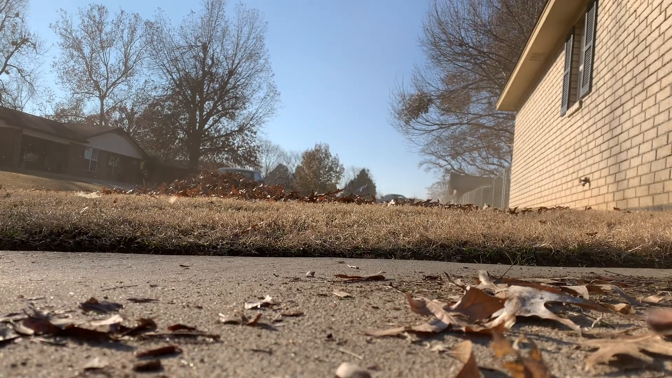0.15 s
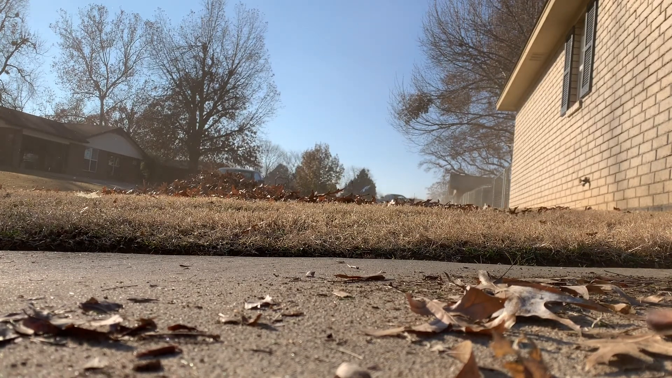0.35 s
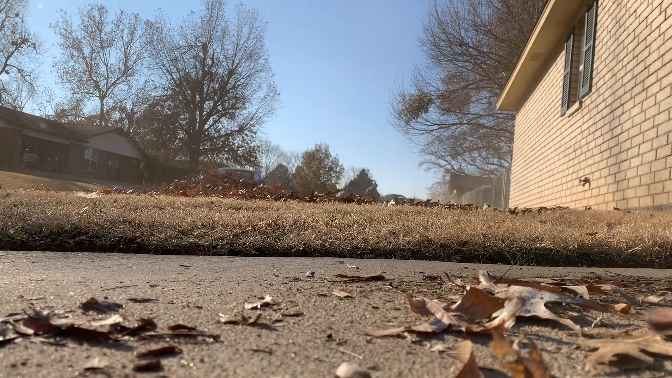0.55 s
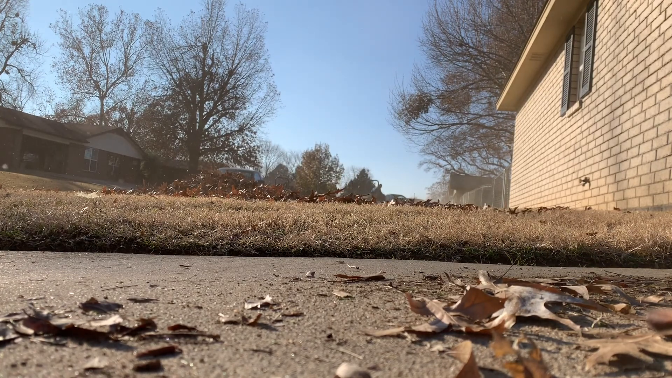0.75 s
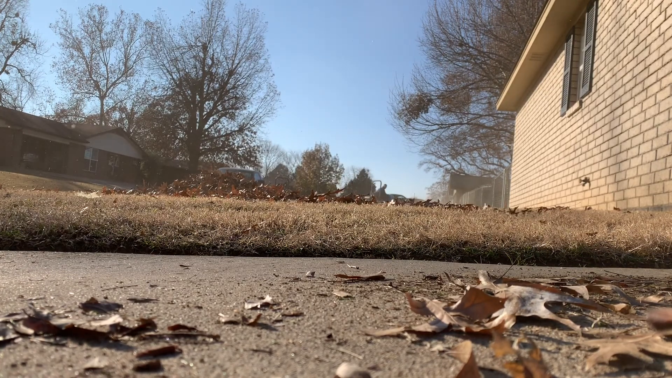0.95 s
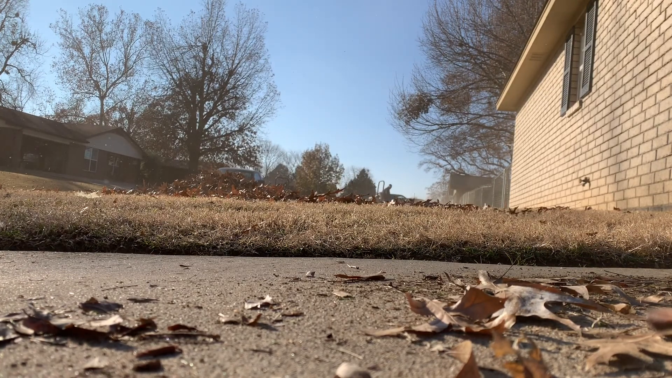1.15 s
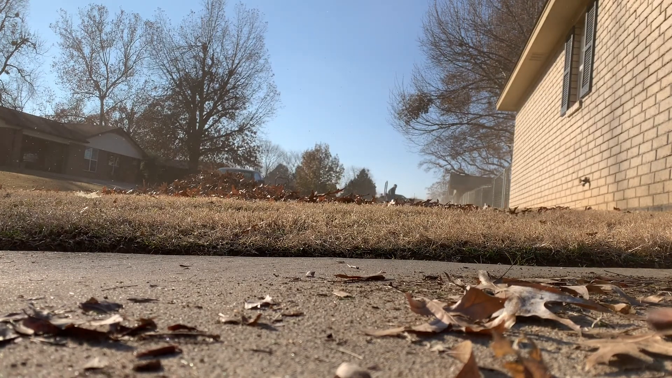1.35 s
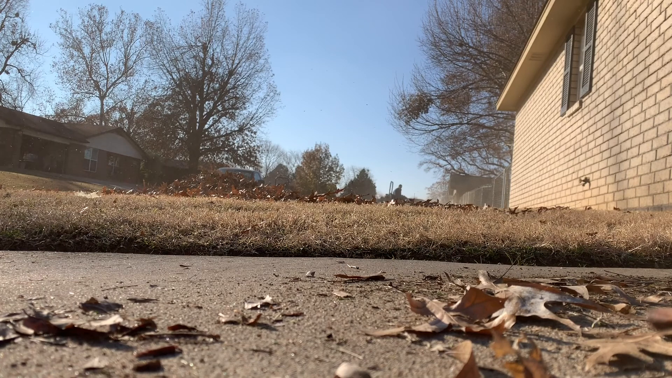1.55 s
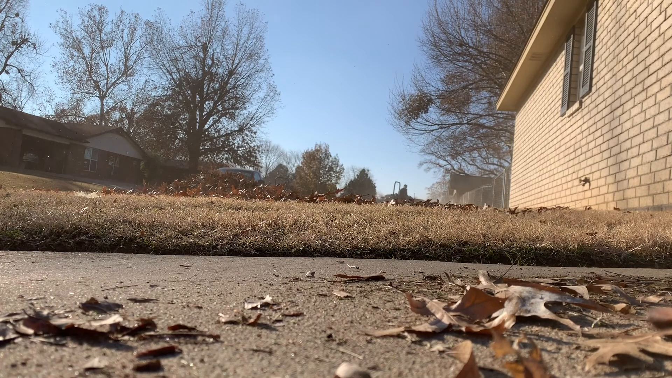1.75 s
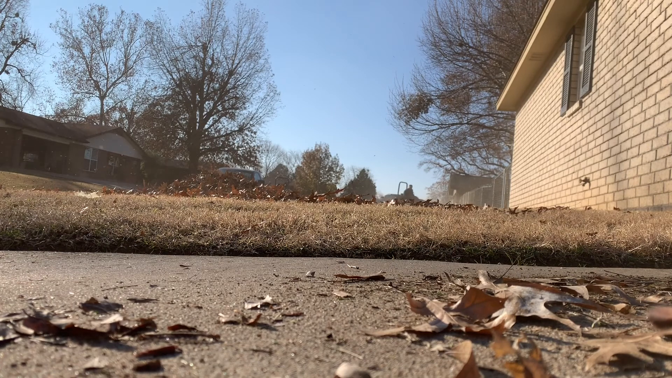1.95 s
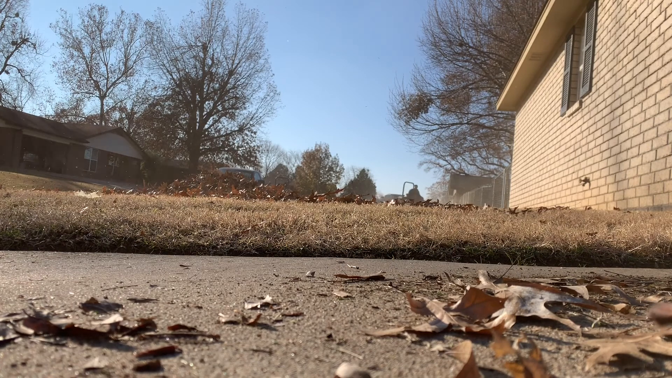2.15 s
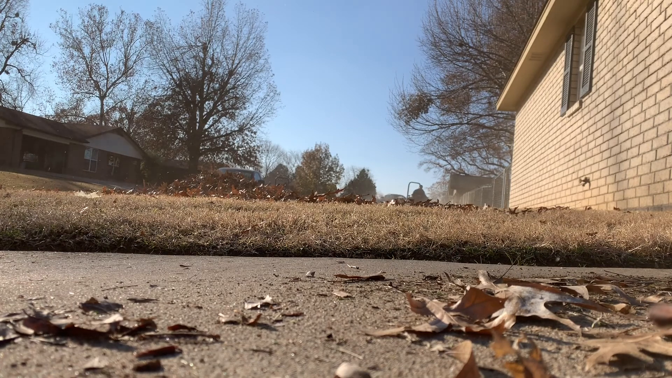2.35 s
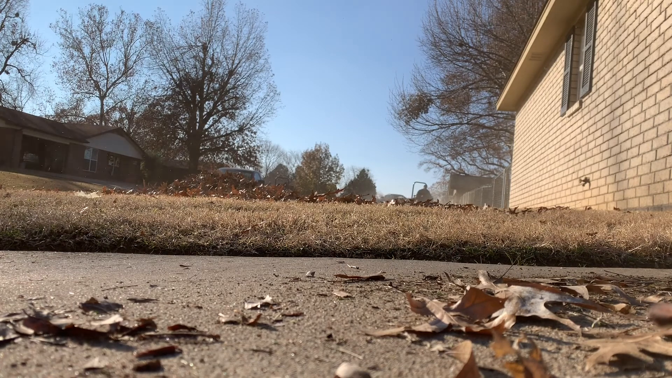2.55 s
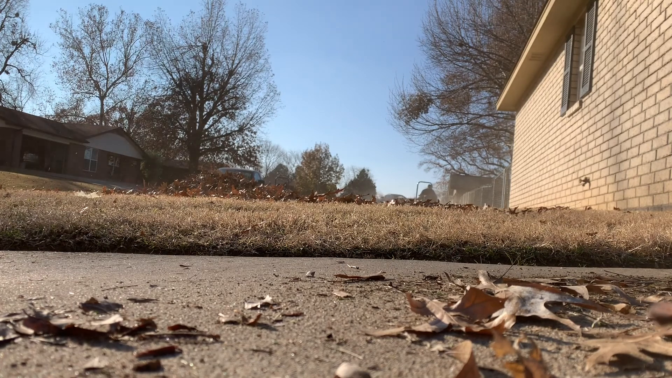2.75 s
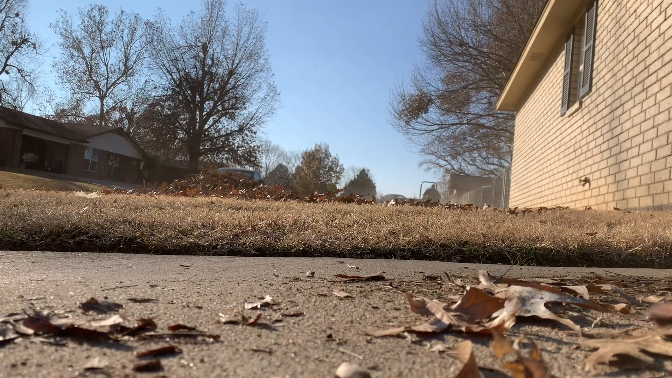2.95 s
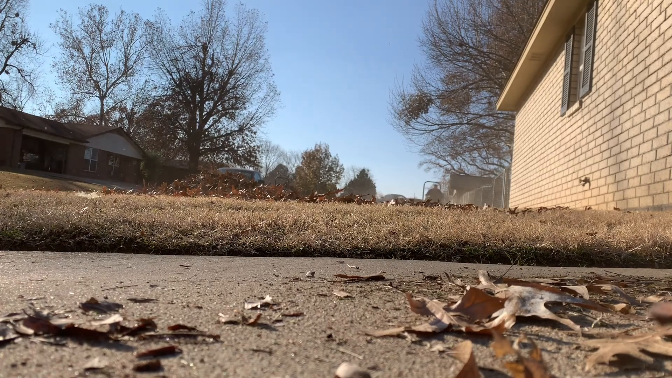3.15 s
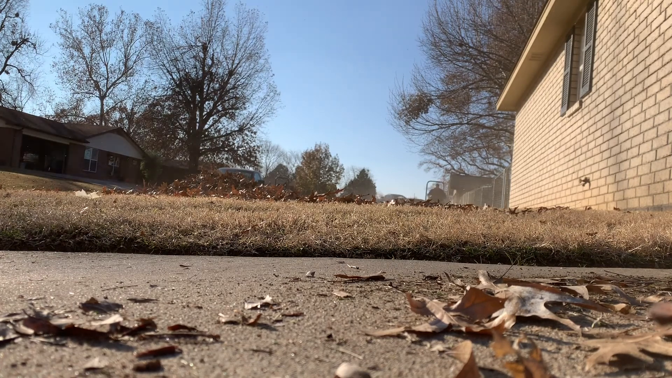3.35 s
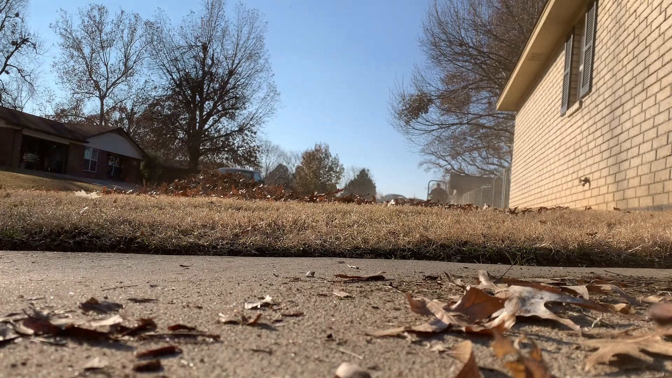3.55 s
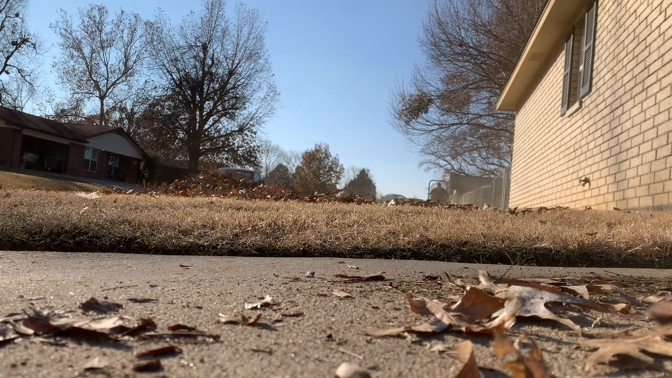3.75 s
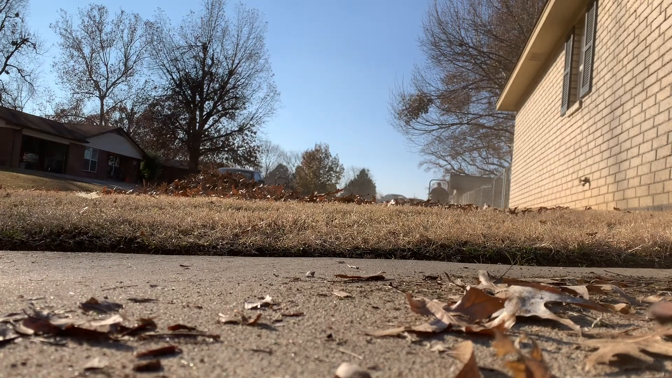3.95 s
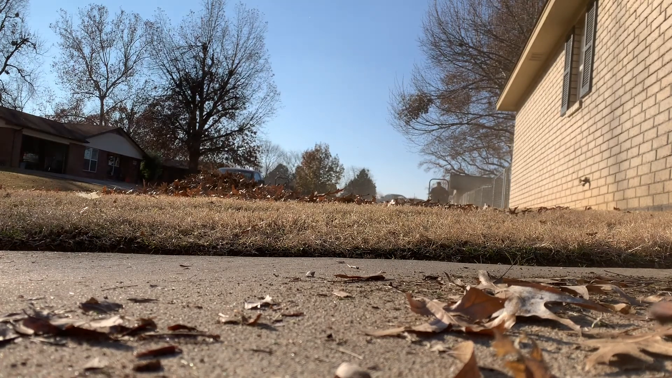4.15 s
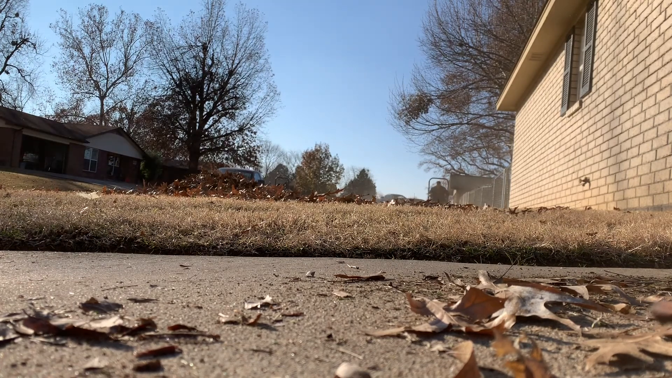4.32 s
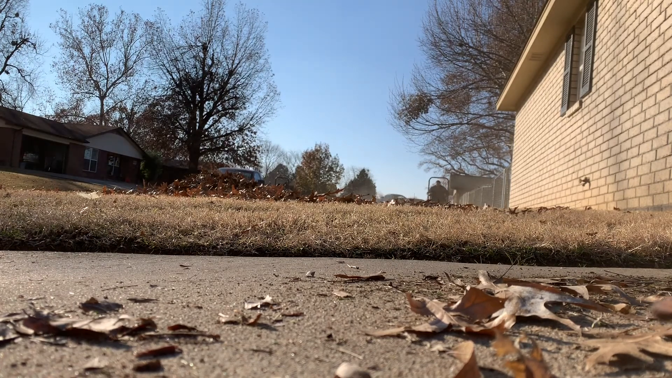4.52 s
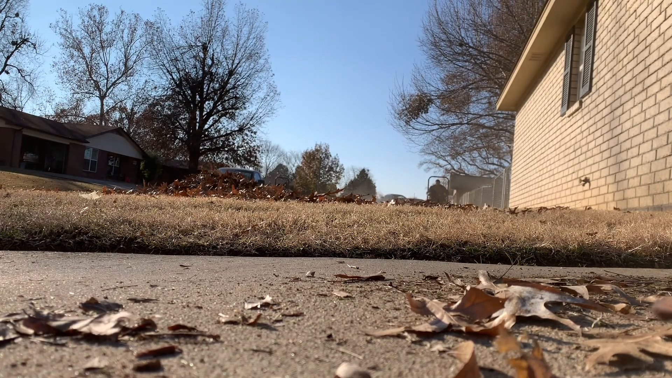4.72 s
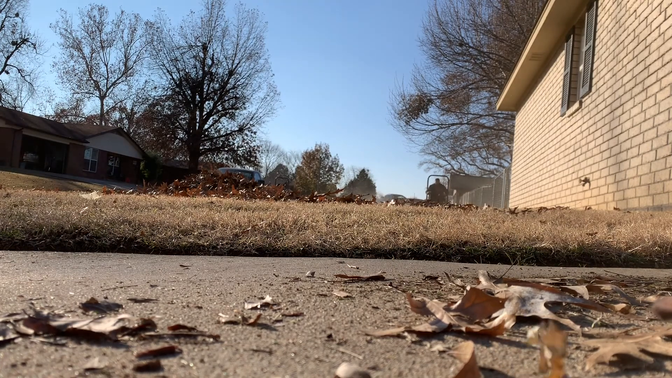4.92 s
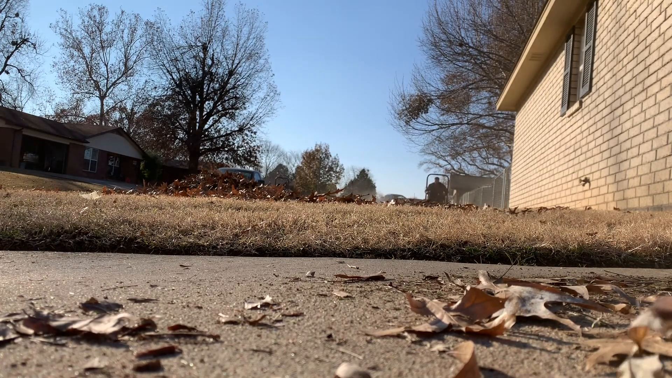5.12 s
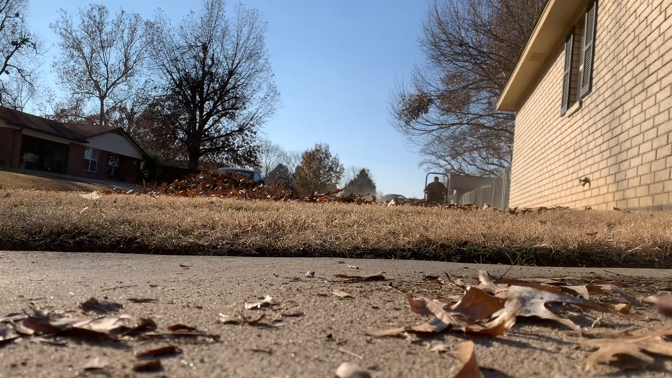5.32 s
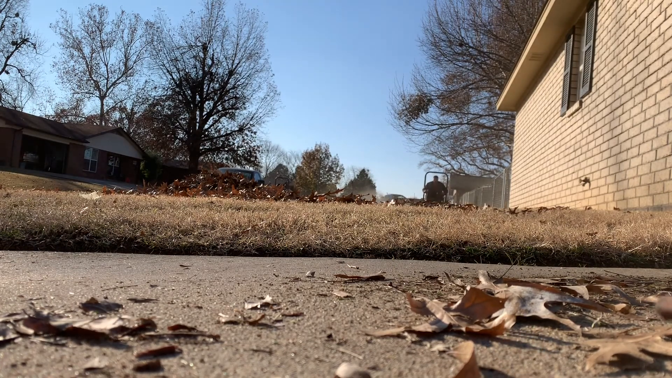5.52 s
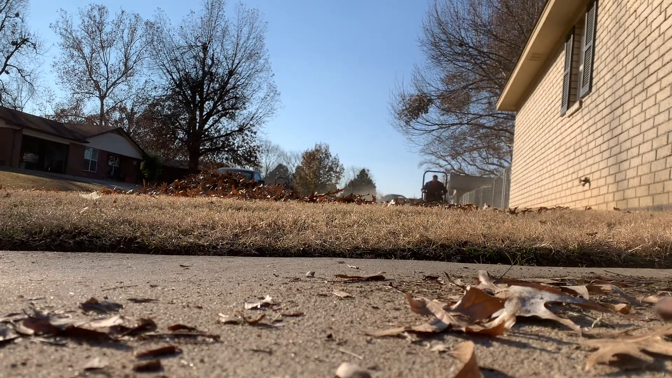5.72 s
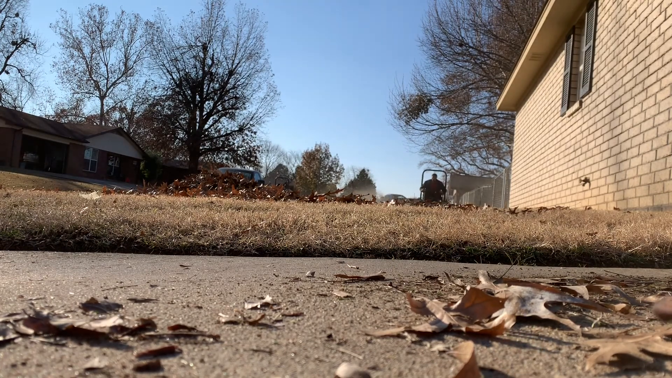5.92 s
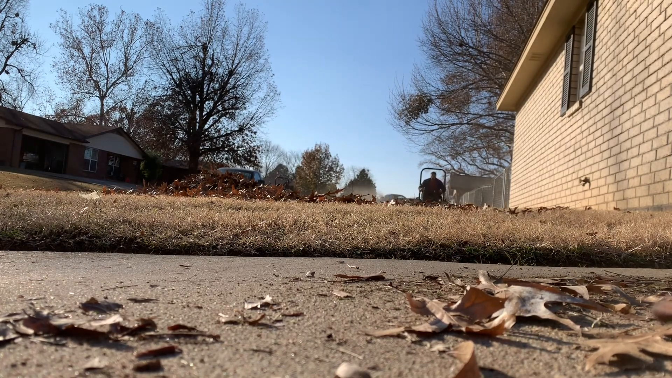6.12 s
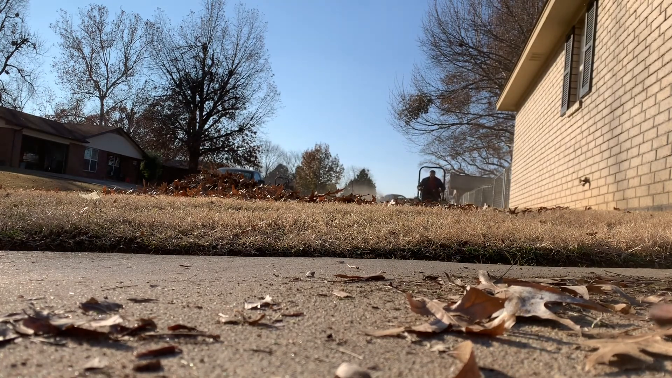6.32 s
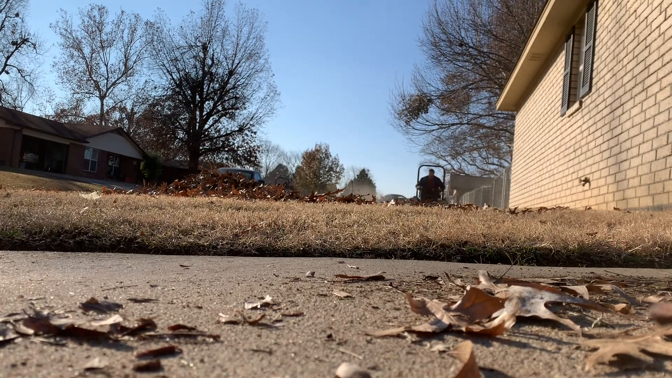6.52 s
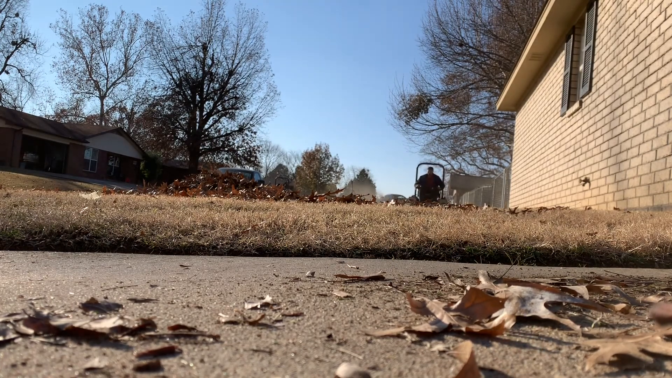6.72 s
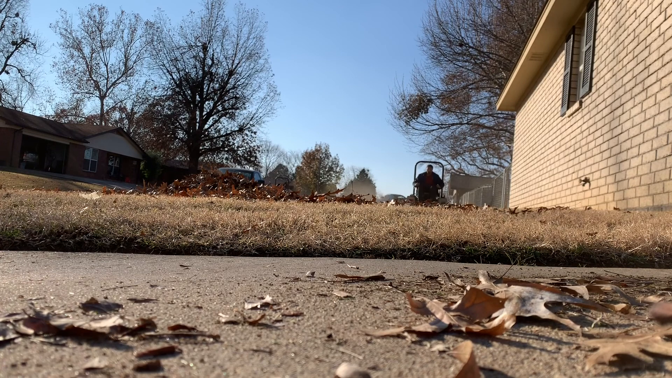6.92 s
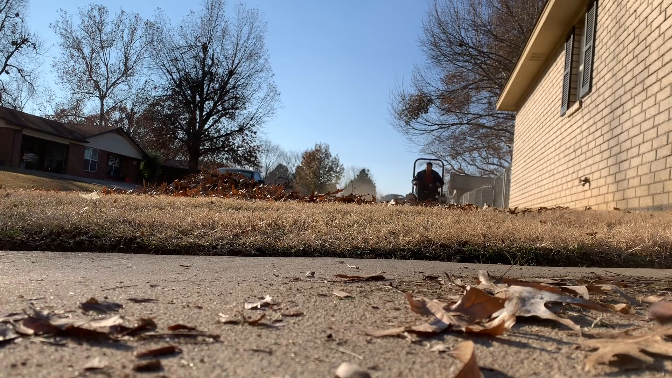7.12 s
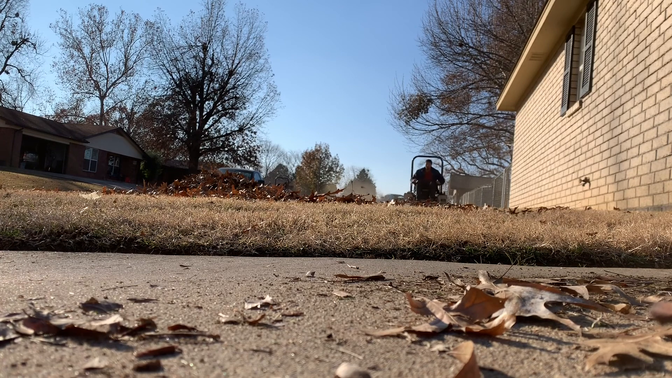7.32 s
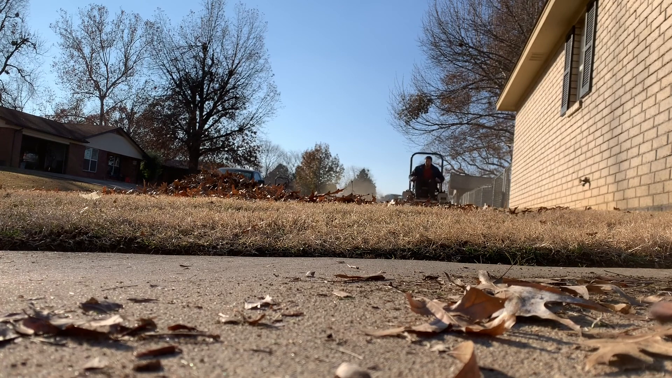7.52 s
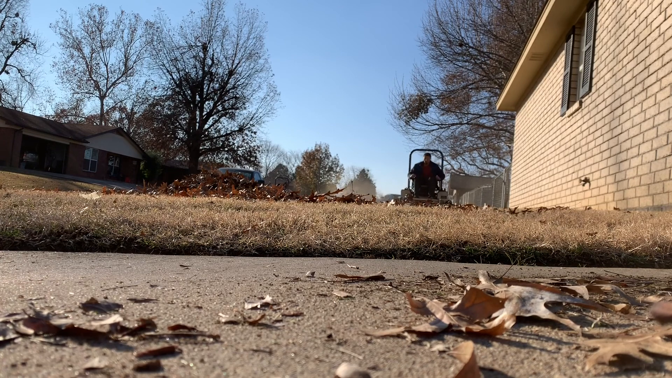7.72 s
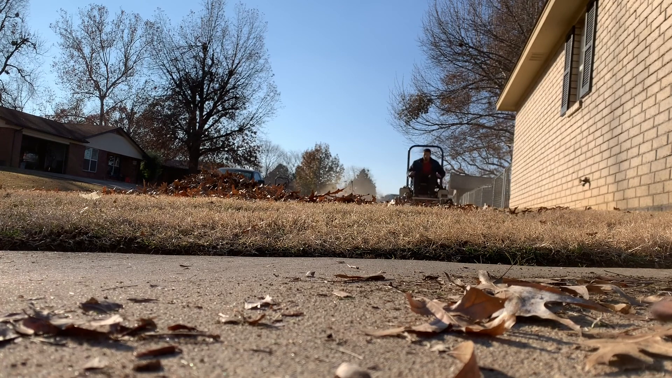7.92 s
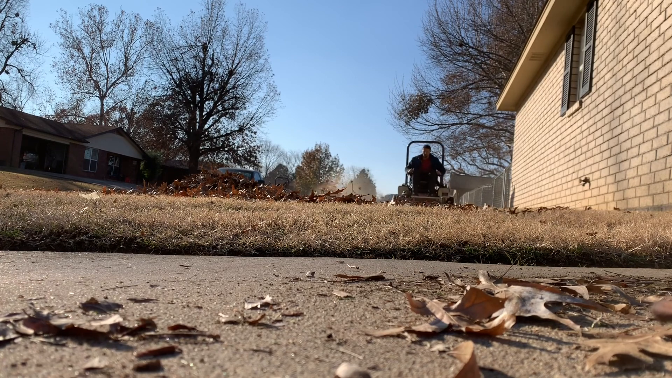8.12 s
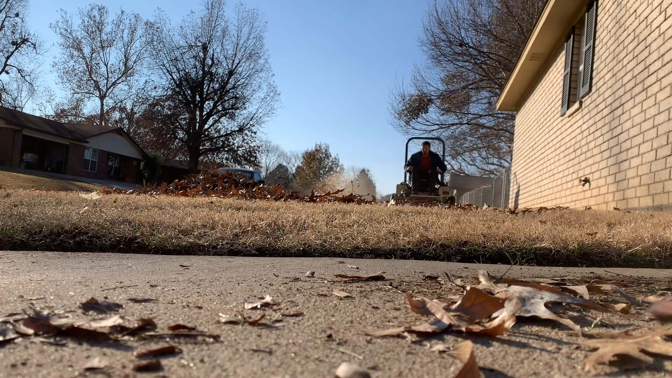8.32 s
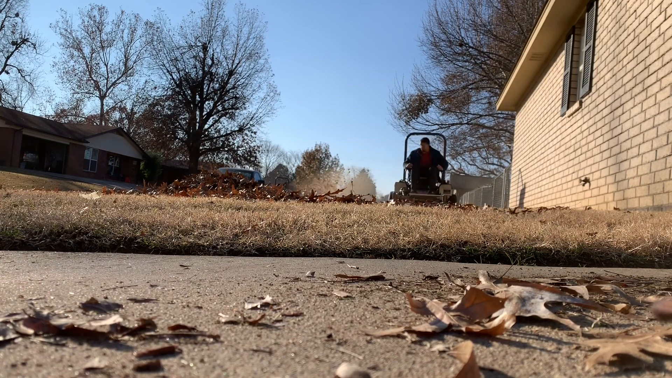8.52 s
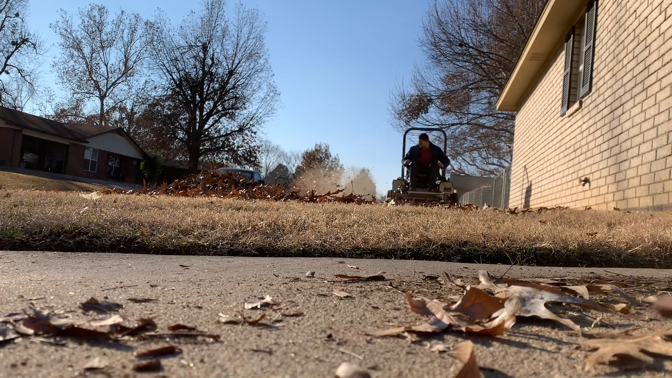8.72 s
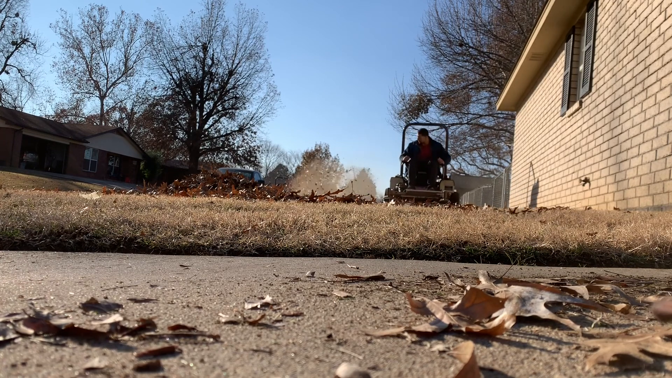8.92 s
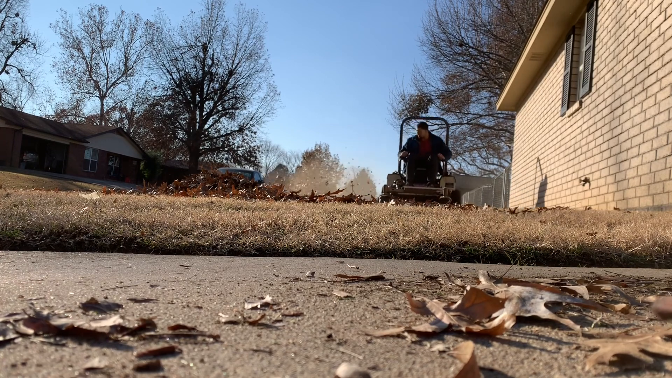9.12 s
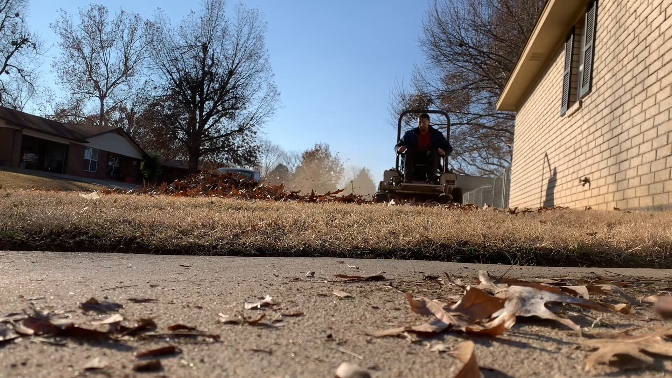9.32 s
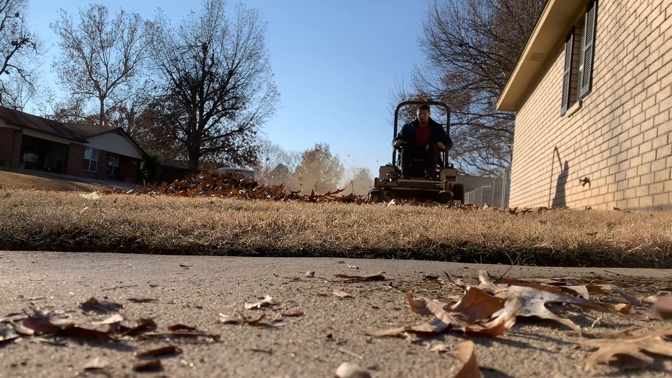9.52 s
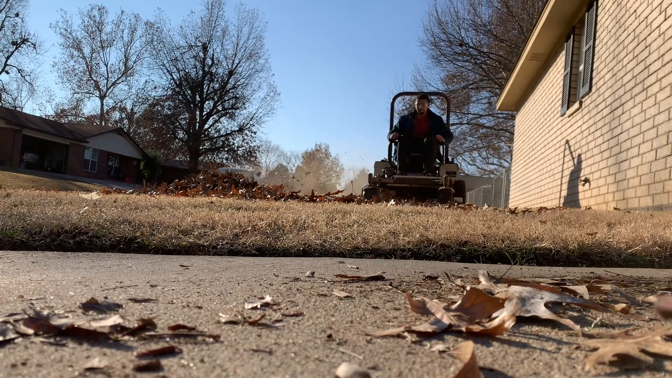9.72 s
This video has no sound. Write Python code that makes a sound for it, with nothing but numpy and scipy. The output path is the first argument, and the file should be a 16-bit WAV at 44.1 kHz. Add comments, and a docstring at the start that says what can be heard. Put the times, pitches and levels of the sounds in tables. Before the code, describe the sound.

Outdoors, a ride-on mower runs continuously, heard from a fixed microphone close to the ground. From 0 to 2 seconds it is distant: a low, steady engine hum near 60 to 180 hertz with a blade drone around 130 hertz that beats and wavers, a soft airy roar, and a few faint leaf ticks near 0.7. Between 2 and 4 seconds it turns and the deck roar opens. From about 4 seconds dry leaf hiss rises, with a wind buffet around 5 and a brief shredding surge near 5.9. Bright leaf snaps scatter from 5 to 9. Short hollow knocks of twigs on the steel deck start at 6.5, cluster between 6.7 and 8.1, and recur near 8.5, 9.1 and 9.7. An overtone whine swells irregularly. The mower keeps approaching, roar and crisp hiss strongest at the end, near 9.8 seconds, without stopping.

```python
"""The throb of mower blades over a two-cylinder engine, far off: a ride-on mower turns and drives nearer.
Engine and blades are sums of wavering sines; three belt-driven spindles beat as they creep apart.
Deck roar, drone, wind and leaf hiss are coloured noise; cracks are short noise puffs.
Twigs ring two modes of the steel pan. Two microphone ports hear it all with a lag between them."""
import sys
import numpy as np
from scipy import signal
from scipy.fft import rfft, irfft, next_fast_len
from scipy.io import wavfile
from scipy.ndimage import uniform_filter1d, map_coordinates

SR = 44100
rng = np.random.default_rng(int(sys.argv[2]) if len(sys.argv) > 2 else 0)


def makeup_ratio(level_db):
    """Linear amplitude ratio for a level in decibels (20 dB per factor of ten)."""
    decades = np.asarray(level_db, float) / 20
    return 10 ** decades


def master_out(mix):
    """Clip the mix to full scale and print it as 16-bit PCM to the path in sys.argv[1]."""
    frames = np.transpose(np.atleast_2d(mix))
    ceiling = np.clip(frames, -1, 1)
    pcm = np.round(ceiling * 32767).astype(np.int16)
    wavfile.write(sys.argv[1], SR, pcm)


N = 430416
M = next_fast_len(N)
HZ = np.maximum(np.arange(M // 2 + 1) * SR / M, 1)
HOP = 512
BINS_HZ = np.maximum(np.arange(2 * HOP + 1) * SR / (4 * HOP), 1)
FRAMES_S = np.arange(-(-N // HOP) + 1) * HOP / SR
TIME_S = np.arange(N) / SR
BELT_RATIO = 4.466  # blade passes per engine cycle


def curves(table, t):
    """Columns of a table joined by straight lines at times t."""
    s, *columns = np.transpose(table)
    return [np.interp(t, s, c) for c in columns]


def across(table, hz, index):
    """One column of a frequency table on a log axis; two-column tables are silent outside their range."""
    table = np.array(table)
    outside = [-200, -200] if table.shape[1] == 2 else []
    return np.interp(np.log(hz), np.log(table[:, 0]), table[:, index], *outside)


def walk(rate_hz, t):
    """Random levels 1 / rate_hz s apart, joined smoothly; spread near 1."""
    return map_coordinates(rng.standard_normal(int(N / SR * rate_hz) + 3), [t * rate_hz], order=2)


def patches(rate_hz, octaves):
    """Random levels over pitch and time, patches so many octaves high and 1 / rate_hz s long."""
    grid = rng.standard_normal((int(np.log2(SR) / octaves) + 2, int(N / SR * rate_hz) + 3))
    where = np.meshgrid(np.log2(BINS_HZ) / octaves, FRAMES_S * rate_hz, indexing="ij")
    return map_coordinates(grid, where, order=1)


def rush(layers, shared_db, quick_db, quick_hz, slow_db, slow_octaves):
    """Two unrelated noises from (colour, level) layers; all swells together, bands flicker, hollows drift."""
    power = 0
    for colour, db in layers:
        shape = makeup_ratio(across(colour, BINS_HZ, index=1)) ** 2
        power = power + np.outer(shape / shape.mean(), makeup_ratio(db) ** 2)
    drift_db = shared_db * walk(9, FRAMES_S)
    drift_db = drift_db + quick_db * patches(quick_hz, 0.4946)
    drift_db = drift_db + slow_db * patches(0.796, slow_octaves)
    noise = signal.stft(rng.standard_normal((2, N)), nperseg=4 * HOP, noverlap=3 * HOP)[2]
    return signal.istft(noise * np.sqrt(power) * makeup_ratio(drift_db), nperseg=4 * HOP, noverlap=3 * HOP)[1][:, :N]


def tone(turns, db, waver_db, rate_hz, slip_turns):
    """A partial whose size and phase waver."""
    size, phase = (np.interp(TIME_S, TIME_S[::64], walk(rate_hz, TIME_S[::64])) for _ in range(2))
    angle = 2 * np.pi * (turns + rng.random() + slip_turns * phase)
    return np.sqrt(2) * makeup_ratio(db + waver_db * size) * np.sin(angle)


def swell(start_s, end_s, db):
    """A rounded rise and fall in dB."""
    return db * np.sin(np.pi * np.clip((FRAMES_S - start_s) / (end_s - start_s), 0, 1))


# Engine cycle of two shaft turns. Each row: time in seconds, cycle rate in Hz,
# levels of the 2nd, 3rd and 6th multiple in dB.
ENGINE_CYCLE = [(0.0, 29.26, -52, -45, -44), (0.7, 28.86, -44.5, -44, -45.5),
                (1.22, 29.02, -45, -46.5, -46.5), (1.9, 29.25, -45, -48, -49.5),
                (3.05, 29.36, -48.5, -46.5, -54), (3.66, 29.47, -42.5, -45.5, -50.5),
                (4.27, 29.27, -46, -44, -49), (4.88, 29.49, -42, -41, -43.5),
                (5.49, 29.41, -43.5, -42.5, -46.5), (6.1, 29.55, -43.5, -49, -43),
                (7.32, 29.22, -40, -40.5, -44), (7.93, 29.31, -41.5, -48, -42.5),
                (8.54, 29.55, -41.5, -39, -43), (9.15, 29.54, -37.5, -39, -47),
                (9.76, 29.26, -41, -34.5, -43)]
# Other multiples. Each row: multiple, level in dB over the mean of the three above.
ENGINE_OTHERS = [(1, -21), (4, -8.5), (5, -2), (7, -14), (8, -9), (10, -7), (11, -20.5), (12, -18),
                 (14, -9), (15, -24.5)]


def engine():
    """Uneven firing of two cylinders fills in many multiples of the cycle; also returns cycles turned."""
    hz, *levels_db = curves(ENGINE_CYCLE, TIME_S)
    turns = np.cumsum(hz) / SR
    main = sum(tone(k * turns, db, .6, 6., .01) for k, db in zip([2, 3, 6], levels_db))
    mean_db = np.mean(levels_db, 0)
    others = sum(tone(round(k) * turns, mean_db + db, 2., 1.485, 0.04) for k, db in ENGINE_OTHERS)
    return main + others, turns


# Spindles creep on the belt. Each row: time in seconds, lead of the second
# and of the third spindle over the first in blade passes.
SPINDLE_LEADS = [(0.0, 1.09, -0.209), (0.49, 1.197, -0.14), (0.98, 1.282, -0.196), (1.46, 1.336, -0.219),
                 (1.95, 1.609, -0.3), (2.44, 1.769, -0.4), (2.93, 2.074, -0.26), (3.42, 2.224, -0.28),
                 (3.9, 2.224, -0.46), (4.39, 2.142, -0.45), (4.88, 2.392, -0.59), (5.37, 2.336, -0.36),
                 (5.86, 2.593, -0.24), (6.34, 2.571, 0.164), (6.83, 2.476, -0.15), (7.32, 2.617, -0.27),
                 (7.81, 2.76, -0.251), (8.3, 2.824, -0.35), (8.78, 2.877, -0.45), (9.27, 2.791, -0.55),
                 (9.76, 2.511, -0.43)]
# Overtones of one spindle. Each row: multiple of the blade pass, level at the far end in dB,
# share of the roar's rise (0-1).
SPINDLE_TONES = [(1, -35.5, 0.26), (2, -40, 0.19), (3, -49.5, 0.58), (5, -61, 0.69), (6, -62, .8)]
# Slow level changes of the spindle tones. Each row: time in seconds, change in dB.
SPINDLE_DRIFT = [(0, 2), (.5, 1.5), (1.2, 0.5), (2.4, .1), (3.4, -1), (4.5, 1.5), (5.2, -1.5), (5.8, -2),
                 (6.4, 1.5), (7.7, 0.5), (8.6, 0.5), (9.2, 0.8), (9.5, -1.5), (9.76, -2.5)]
# Fourth overtone, swelling at its own moments. Each row: time in seconds, level in dB.
FOURTH_TONE = [(0, -70), (0.9, -73), (1.3, -55), (2.37, -46.5), (2.8, -56), (3.6, -65), (4.6, -46),
               (5.05, -55), (5.6, -45.5), (6.2, -57), (6.5, -40), (6.85, -37.5), (7.35, -54), (7.7, -36.5),
               (8.25, -55), (8.6, -44), (9, -61), (9.76, -36.5)]
# Highest overtones. Each row: multiple of the blade pass, level in dB over the pan noise layer.
TOP_TONES = [(7, -10), (8, -9.5), (9, -10), (10, -16.5)]


def blades(turns, pan_db, rise_db):
    """Blade-pass tone of three spindles: where they line up an overtone swells, where they oppose it dies."""
    others_db = (-4.5, -3)  # second and third spindle against the first
    hidden_db, open_by_s = -9, 1.8  # 5th and 6th are held down until the deck swings into the open
    leads = curves(SPINDLE_LEADS, TIME_S)
    drift_db, = curves(SPINDLE_DRIFT, TIME_S)
    hidden = np.clip((open_by_s - TIME_S) / .2, 0, 1)
    out = tone(4 * turns, *curves(FOURTH_TONE, TIME_S), 1.85, 14., .048)
    for k, far_db, share in SPINDLE_TONES:
        k = round(k)
        db = far_db + (k > 4) * hidden_db * hidden + share * rise_db + drift_db
        others = sum(makeup_ratio(d) * np.exp(2j * np.pi * k * lead) for d, lead in zip(others_db, leads))
        out = out + abs(1 + others) * tone(k * turns, db, .3 + .45 * k, 14., .011 * k)
    return out + sum(tone(round(k) * turns, pan_db + db, 4.5, 16., .15) for k, db in TOP_TONES)


# Colours of the deck noise layers. Each row: frequency in Hz, relative level in dB.
ROAR_COLOUR = [(250, -19.5), (420, 0.5), (600, -1), (850, -1), (1000, -5), (1400, -30.5)]
PAN_COLOUR = [(800, -33.5), (1000, -4.5), (1190, -0.5), (1280, -9), (1400, -10), (1800, -12.5),
              (2200, -46.5)]
CHUTE_COLOUR = [(1200, -12), (1600, -0.5), (2000, 0), (2600, -2), (3300, -10.5), (4200, -25)]
FAN_COLOUR = [(2800, -12), (3600, 3), (4500, -1), (5200, -4.5), (6000, -12), (8000, -40)]


def deck_air(turns, roar_db, pan_db, chute_db, fan_db):
    """Air roars under the deck, in pan, chute and fan; each blade pass pushes a puff."""
    throb = 1 + 0.091 * np.cos(2 * np.pi * BELT_RATIO * turns)
    layers = [(ROAR_COLOUR, roar_db), (PAN_COLOUR, pan_db), (CHUTE_COLOUR, chute_db), (FAN_COLOUR, fan_db)]
    return throb * rush(layers, 0.93, 1.1, 6., 1.7, .2)


# Colours of low noise. Each row: frequency in Hz, relative level in dB per Hz.
DRONE_COLOUR = [(35, -37), (70, -7), (150, -1.5), (300, 0.5), (450, -8.5), (700, -30)]
WIND_COLOUR = [(15, -8.5), (30, -0.5), (60, -2.5), (110, -13), (200, -39.5)]
# Each row: middle in seconds, half length in seconds, peak in dB over the calm.
WIND_GUSTS = [(0.0, .12, 9), (3.64, .1, 9), (4.1, .2, 7), (4.38, .1, 6.5), (5.05, .3, 15), (5.6, .2, 6),
              (6.87, .15, 10), (9.4, .4, 10.5)]


def drone_and_wind(drone_db):
    """Low deck noise and the rumble of light wind, whose gusts are bell-shaped in dB."""
    calm_db = -59.5
    wind_db = calm_db + sum(db * np.exp(-((FRAMES_S - s) / half) ** 2) for s, half, db in WIND_GUSTS)
    return rush([(DRONE_COLOUR, drone_db), (WIND_COLOUR, wind_db)], 0.32, 1.2, 6., 1.0, 0.53)


# Colours of leaf hiss and its finest part. Each row: frequency in Hz, relative level in dB.
LEAF_COLOUR = [(3500, -24), (5200, 0), (6800, -0.5), (8500, -0.5), (10500, -3), (12500, -4.5), (15000, -25)]
DUST_COLOUR = [(9000, -29), (11500, -5), (14000, 2), (15700, 4), (16300, -50.5)]


def shredding(leaves_db):
    """Leaf hiss, roughened by 5 ms bursts, 90 a second on average, as handfuls meet the blades."""
    bursts = uniform_filter1d((rng.random(N) < 90 / SR) * rng.random(N), size=220) * 220
    dust_db = leaves_db - 11.5 + 5.3 * (FRAMES_S > 7.1)  # the finest hiss steps up against the leaves
    hiss = rush([(LEAF_COLOUR, leaves_db), (DUST_COLOUR, dust_db)], 0.58, 2.1, 7., 0.9, .15)
    return hiss * (1 + 0.54 * bursts)


# Ringing of the steel pan. Each row: frequency in Hz, time to fall 60 dB in seconds.
PAN_RINGS = [(845, 0.083), (1190, 0.052)]


def ring(events):
    """Each blow rings the pan's modes, slightly off pitch every time."""
    out, t = np.zeros(N + 4096), np.arange(4096) / SR
    detunes = 1 + 0.017 * rng.standard_normal((len(events), 2))
    for (s, db, upper), detune in zip(events, detunes):
        for (hz, t60_s), part, d in zip(PAN_RINGS, [1 - upper, upper], detune):
            envelope = np.minimum(t / .003, 1) * np.exp(-np.log(1000) * t / t60_s)
            out[int(s * SR):][:4096] += makeup_ratio(db) * part * envelope * np.sin(2 * np.pi * hz * d * t)
    return out[:N]


def rattle(pan_db):
    """Smaller bits of twig tick the pan at random, 0-7 dB over the pan noise level."""
    chance = rng.random((150, 3))
    times_s = chance[:, 0] * N / SR
    levels_db = np.interp(times_s, FRAMES_S, pan_db) + 7 * chance[:, 1]
    return ring(np.transpose([times_s, levels_db, chance[:, 2]]))


# Each row: start in seconds, level in dB before the band-pass.
LEAF_CRACKS = [(0.6664, -68), (0.7, -68), (0.727, -64), (2.3294, -78), (2.4694, -80), (5.0749, -65),
               (5.3647, -66), (5.8331, -60), (5.886, -55.5), (6.0881, -60), (6.2716, -53), (7.223, -59),
               (7.436, -62), (7.634, -52), (8.1329, -61), (8.4357, -62), (8.841, -58.5), (9.056, -56)]


def cracks():
    """Single leaves snap near by: a few ms of bright noise."""
    puff, t = np.zeros(N + 2048), np.arange(2048) / SR
    for s, db in LEAF_CRACKS:
        puff[int(s * SR):][:2048] += makeup_ratio(db) * np.minimum(t / .001, 1) * np.exp(-t / .007)
    bright = signal.butter(2, [4500, 14000], "bandpass", fs=SR, output="sos")
    return signal.sosfilt(bright, rng.standard_normal((2, N))) * puff[:N]


# Each row: start in seconds, strike level in dB, share of the upper ring (0-1).
TWIG_KNOCKS = [(5.519, -46, .1), (6.459, -24.5, .1), (6.669, -19, 0.37), (6.766, -22, 0.93),
               (7.057, -20, 0.97), (7.103, -29, 0.28), (7.245, -18, 0.58), (7.299, -22.5, 0.88),
               (7.549, -25, .4), (7.799, -24.5, 0.07), (7.901, -21, 0.23), (7.979, -23, 1),
               (8.073, -18.5, 1), (8.096, -25, 0), (8.5, -19, 0.58), (9.052, -29.5, 0.2), (9.699, -24, 1)]


def knocks():
    """Twigs strike the steel pan and set its two modes ringing."""
    return ring(TWIG_KNOCKS)


# Each row: frequency in Hz, phase lag of the left channel in turns,
# likeness of left and right (0-1), left minus right in dB. Above 11 kHz not the ports' doing alone.
CHANNEL_PAIR = [(60, .01, .99, .4), (250, .045, .97, 1.2), (700, .115, .94, -.8), (1150, .19, .94, 1.4),
                (1400, .3, .92, .5), (1900, .47, .88, -1.5), (2150, 1.06, .72, -1.5),
                (2650, 1.16, .68, -1.2), (3500, 1.5, .78, 1), (3900, 1.8, .82, 1), (4450, 1.95, .6, 1),
                (5000, 2.33, .7, .5), (5400, 2.47, .75, .3), (6000, 2.75, .62, 0), (7100, 3.56, .6, 0),
                (9100, 3.96, .72, -1), (11400, 4.5, .9, 0), (13000, 4.9, .88, 0), (14300, 5.07, .9, 0),
                (15500, 5.5, .88, 0)]


def ports(pair):
    """Left hears the first sound late; right hears it mixed with the unrelated second one."""
    first, second = rfft(pair, M)
    like = across(CHANNEL_PAIR, HZ, index=2)
    tilt = makeup_ratio(across(CHANNEL_PAIR, HZ, index=3) / 2)
    lag_turns = np.interp(HZ, *np.transpose(CHANNEL_PAIR)[:2])
    left = first * np.exp(-2j * np.pi * lag_turns) * tilt
    right = (like * first + np.sqrt(1 - like ** 2) * second) / tilt
    return irfft(np.array([left, right]), M)[:, :N]


# Bearing in the turn. Each row: time in seconds, shift to the left in dB (left minus right).
TURN_BEARING = [(0, -1), (1.9, -0.8), (2.2, .6), (4.8, 0.6), (5.2, 0.1), (9.76, 0)]


def bearing(pair):
    """Level difference between the ports follows the mower through the turn."""
    shift_db, = curves(TURN_BEARING, TIME_S)
    return pair * makeup_ratio(shift_db * np.array([[.5], [-.5]]))


def deck_levels(roar_rise_db, hiss_rise_db):
    """Pan, chute and fan levels follow shares of the roar's and the leaf hiss's rise."""
    pan_db = -56.5 + 0.17 * roar_rise_db + 0.43 * hiss_rise_db
    chute_db = -62.5 + 0.37 * roar_rise_db + 0.4 * hiss_rise_db
    fan_db = -69.5 + .01 * roar_rise_db + 0.65 * hiss_rise_db
    pan_db = pan_db + swell(5.23, 10.3, 5.94)  # twigs under the deck make the pan ring more
    chute_db = chute_db + swell(3.77, 5.54, 3)  # the chute swings past the phone
    fan_db = fan_db + 6 * np.clip(1 - FRAMES_S / 2.3, 0, 1)  # the engine fan turns away from the phone
    return pan_db, chute_db, fan_db


# The mower turns and nears. Each row: time in seconds, deck drone in dB, deck roar in dB, leaf hiss in dB.
MOWER_APPROACH = [(0.0, -48, -50.5, -75.5), (0.7, -50.5, -56.5, -74), (1.22, -45, -54.5, -75.5),
                  (1.6, -45.5, -49, -75), (2.74, -41, -45.5, -74.5), (3.3, -43, -43.5, -74),
                  (3.75, -40, -44, -70), (4.25, -40, -42, -65), (5.4, -41, -42.5, -64),
                  (5.73, -40.5, -39.5, -61.5), (5.9, -38, -38, -56.5), (6.05, -40, -39.5, -59.5),
                  (6.65, -41.5, -37, -59), (7.2, -36.5, -35, -58.5), (8.1, -40.5, -37, -58),
                  (9.3, -46.5, -36.5, -53.5), (9.76, -59, -33.5, -52.5)]


def scene():
    """Tones, deck noise pulsed by the blades, leaves, knocks and wind."""
    drone_db, roar_db, leaves_db = curves(MOWER_APPROACH, FRAMES_S)
    roar_rise_db = roar_db - roar_db[0]
    pan_db, chute_db, fan_db = deck_levels(roar_rise_db, leaves_db - leaves_db[0])
    hum, turns = engine()
    smooth_rise_db = uniform_filter1d(roar_rise_db, size=30)
    blade_pan_db, blade_rise_db = (np.interp(TIME_S, FRAMES_S, db) for db in (pan_db, smooth_rise_db))
    pair = deck_air(turns, roar_db, pan_db, chute_db, fan_db)
    pair += drone_and_wind(drone_db)
    pair += shredding(leaves_db) + cracks()
    pair[0] += hum + blades(BELT_RATIO * turns, blade_pan_db, blade_rise_db)
    pair[0] += rattle(pan_db) + knocks()
    return bearing(ports(pair))


def band_limit(x):
    """A steep low-pass at the top of the band."""
    return signal.sosfilt(signal.butter(12, 15660, fs=SR, output="sos"), x)


def record(dry):
    """Hands on the finished mix of the two ports."""
    return band_limit(dry)


dry = scene()
out = record(dry)
master_out(out)
```